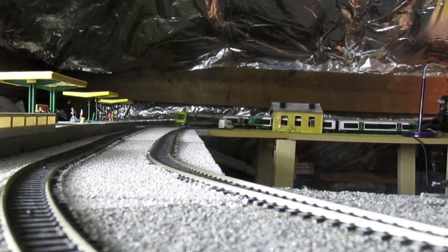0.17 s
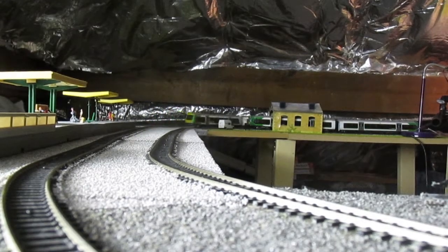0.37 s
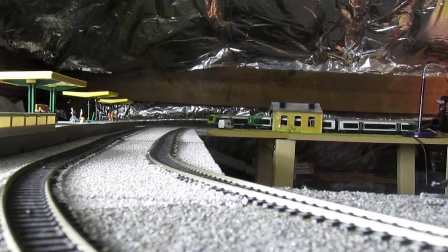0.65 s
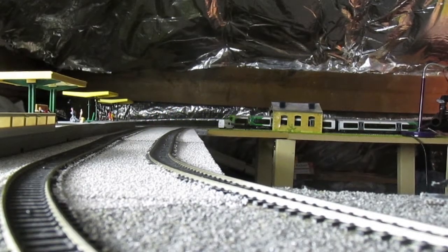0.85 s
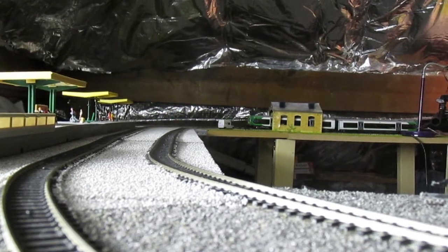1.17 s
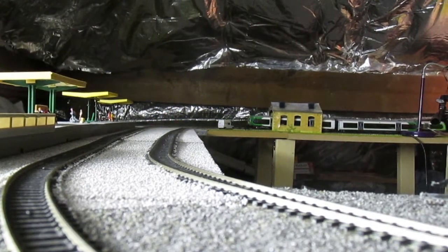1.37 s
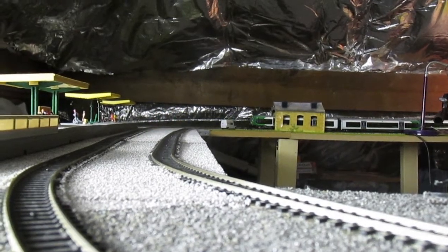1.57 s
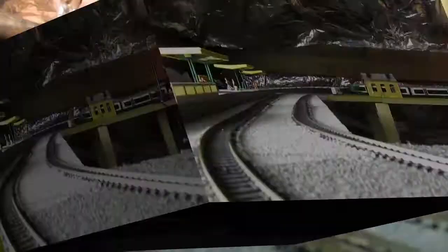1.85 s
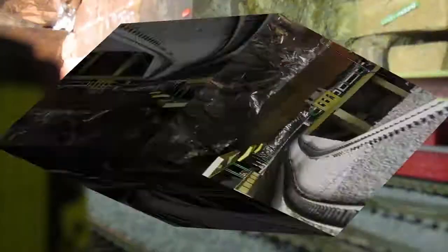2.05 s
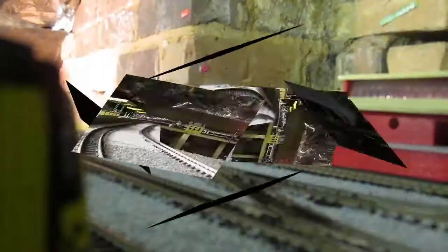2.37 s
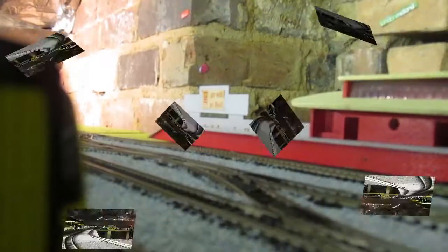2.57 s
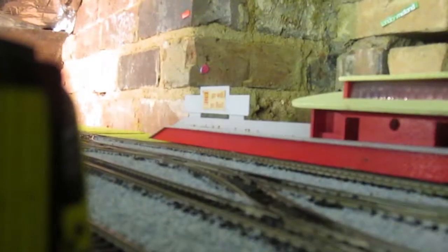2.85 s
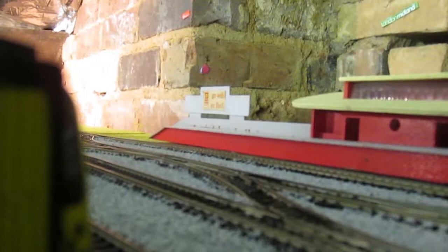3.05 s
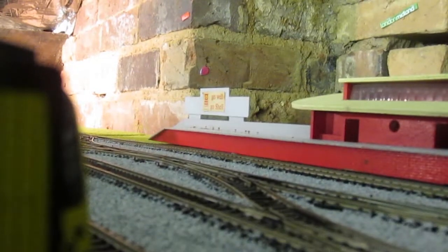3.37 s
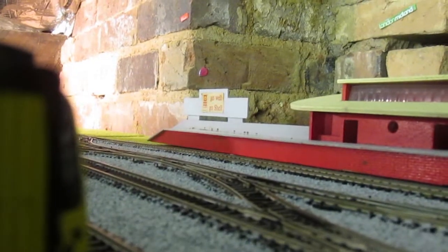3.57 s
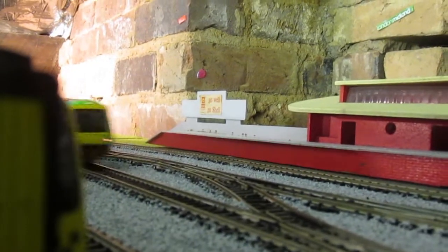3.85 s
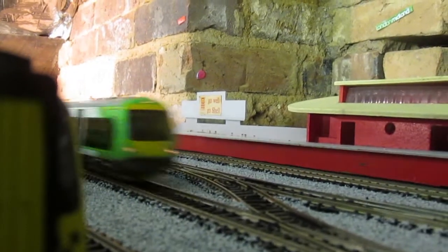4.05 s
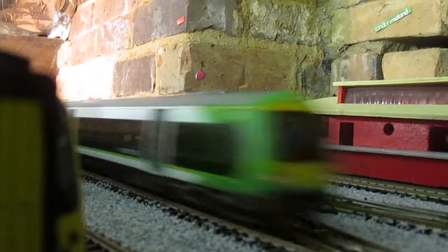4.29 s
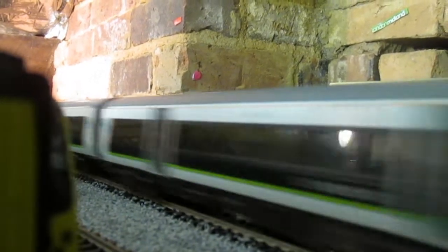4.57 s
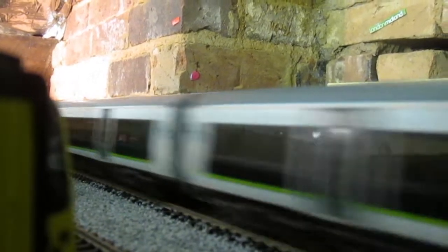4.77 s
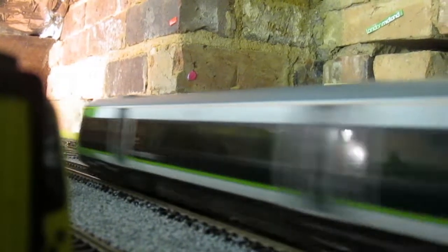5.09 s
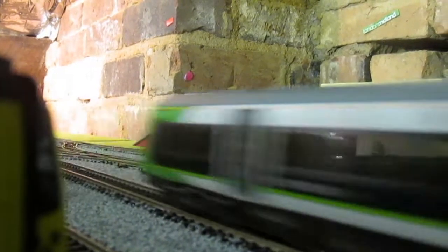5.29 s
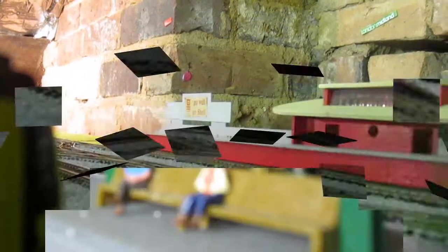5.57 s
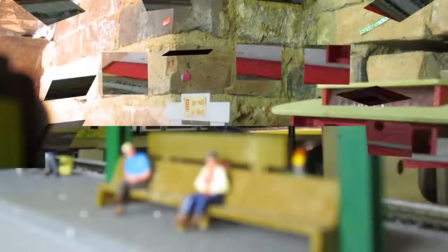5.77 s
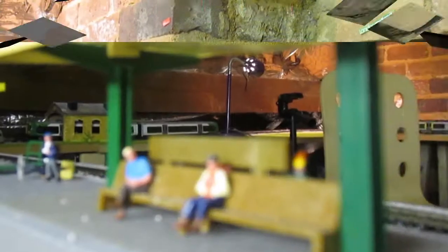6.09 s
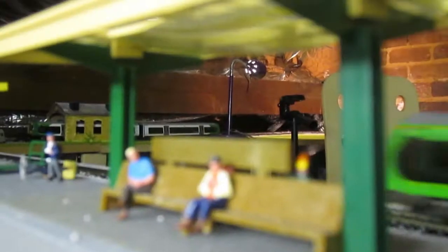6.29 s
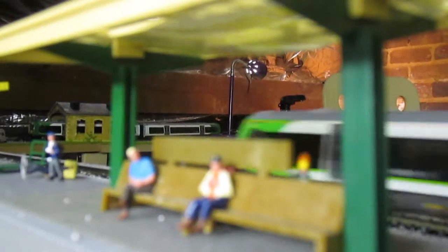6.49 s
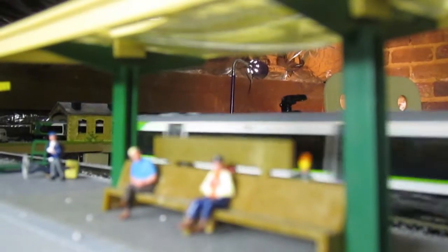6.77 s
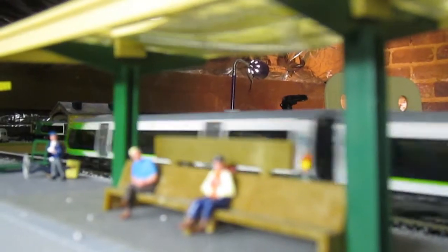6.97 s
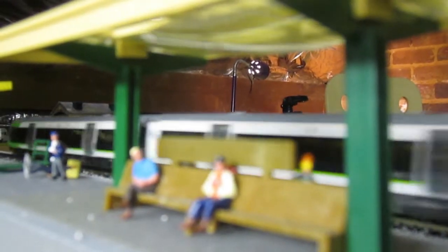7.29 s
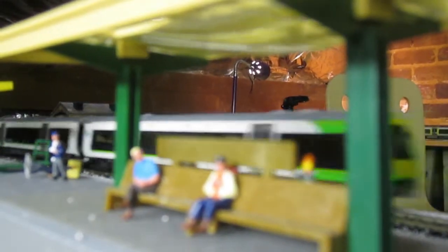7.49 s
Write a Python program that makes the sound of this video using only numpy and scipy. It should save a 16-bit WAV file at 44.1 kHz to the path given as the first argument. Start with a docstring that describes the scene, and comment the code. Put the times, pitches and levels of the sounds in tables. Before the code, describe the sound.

Model railway indoors, three abrupt viewpoints. Steady high motor whine and faint wheel hiss far off, cut to near silence. Beside the points, rumble and rattle swell into dense bright joint clicks, coupling clacks, gritty scrapes and low board knocks. A second short dropout leads to the platform: humming motor, swelling wheel roar, scattered clicks. Close stereo microphone, very little echo.

```python
"""A thin motor whine and the singing, hissing roll of wheels come first: a model train on an indoor layout.
It is heard from three places in turn, far across the board, beside a set of points, and from a station
platform, with a near-silent gap between them. The motor is a set of sine waves at multiples of its shaft
speed; the wheels are filtered noise and tiny hits; joints, couplings and the baseboard are struck
resonances or short bursts of filtered noise. A short room tail surrounds the wheel sounds."""
import sys
import numpy as np
from scipy import signal
from scipy.fft import rfft, irfft
from scipy.io import wavfile

SR = 44100
rng = np.random.default_rng(int(sys.argv[2]) if len(sys.argv) > 2 else 0)


def store_pcm(level_fs):
    """Save levels as 16-bit WAV."""
    pcm = np.round(np.clip(level_fs, -1, 1) * 32767).astype(np.int16)
    wavfile.write(sys.argv[1], SR, np.atleast_2d(pcm).T)


N = 336483
TIME = np.arange(N) / SR  # seconds
HZ = np.maximum(np.arange(N // 2 + 1) * SR / N, 1)  # pitches of the spectrum, kept above zero

# Rolling swells as the train comes near, and the flanges rub harder in the bends, at each place:
# time_s, rolling_db, flange_rub_db (relative; each sound follows them by its own amount)
ROLLING_FAR = [(0, 1, -0.5), (0.35, -1, -3.5), (0.95, -0.5, -5), (1.58, -3.5, -11), (1.75, -3, -7),
               (2.14, -2.5, -11)]
ROLLING_POINTS = [(2.3, -8.5, -9.5), (2.62, -8, -14.5), (2.92, -7, -8.5), (3.18, -4, -6.5),
                  (3.33, -4.5, -4.5), (3.55, -2, -3), (3.72, -2, -2.5), (3.9, -0.6, -2.5), (4.11, -2, -2),
                  (4.25, -0.5, -2.5), (4.62, 0.2, -2), (4.85, -0.8, -8), (5.03, -1.5, -8), (5.28, -2.2, -4),
                  (5.45, -3, -14)]
ROLLING_STATION = [(5.87, -9.5, -24.5), (6.17, -6.5, -14), (6.41, -3.5, -0.5), (6.57, -2.5, -5),
                   (6.69, -1.5, -0.5), (6.96, -2, -1), (7.08, -1, -0.5), (7.33, 0.2, -0.2), (7.63, -1, 1.2)]
# Wheels cross rail joints and point blades:
# time_s, level_db (relative), centre_hz, sharpness (filter Q), ring_s (time to fall 60 dB)
JOINT_CLICKS = [(0.141, -19, 4500, 1, 0.016), (0.76, -19, 4200, 0.9, 0.02), (0.846, -20, 4500, 1, 0.014),
                (2.026, -22, 4500, 1, 0.014), (3.199, -13.5, 3360, 1.3, 0.02),
                (3.261, -15.5, 4000, 1.2, 0.034), (3.548, -13, 4800, 1.6, 0.016),
                (3.5704, -7.5, 3330, 0.65, 0.015), (3.6362, -9.5, 3500, 0.73, 0.033),
                (3.734, -19, 4400, 1.2, 0.015), (3.8237, -12, 3850, 2.2, 0.011),
                (3.892, -5, 3300, 0.64, 0.016), (3.902, -16, 4200, 1.3, 0.017),
                (3.956, -3, 4500, 2.4, 0.03), (3.974, -18, 3060, 1.2, 0.016),
                (3.9825, -9, 4660, 1.5, 0.016), (3.991, -12, 4100, 1.8, 0.014),
                (4.0095, -17, 3760, 1.6, 0.016), (4.0194, -6.5, 3520, 1.6, 0.018),
                (4.074, -13, 4400, 1.3, 0.012), (4.13, -13, 5000, 1.3, 0.0091),
                (4.153, -12, 4400, 1.3, 0.014), (4.215, -12.5, 4010, 1.5, 0.048),
                (4.278, -6, 5000, 3.2, 0.025), (4.371, -16, 5200, 1, 0.018),
                (4.553, -8.5, 3200, 1.3, 0.021), (4.618, -9.5, 3500, 0.86, 0.038),
                (4.679, -4, 3620, 1.4, 0.014), (4.7298, -11, 3640, 1.1, 0.016),
                (4.748, -17, 4300, 1.3, 0.016), (4.8104, -7.5, 4400, 1.3, 0.031),
                (4.8736, -6, 4100, 1.4, 0.016), (4.888, -13, 4300, 1.3, 0.012),
                (5.049, -11.5, 3920, 3.2, 0.02), (5.144, -13.5, 3000, 2.6, 0.036),
                (5.202, -6, 4100, 1.4, 0.016), (5.265, -8, 4300, 1.3, 0.023),
                (5.521, -15, 3500, 2.8, 0.012), (5.5858, -14.5, 5960, 0.75, 0.019),
                (5.974, -21, 3600, 0.6, 0.02), (6.0485, -16, 3200, 0.53, 0.02),
                (6.421, -10, 3430, 0.85, 0.023), (6.4916, -8.5, 3300, 1.2, 0.011),
                (6.517, -17, 4200, 1.2, 0.014), (6.676, -6.5, 3030, 1.6, 0.016),
                (6.7, -15, 4070, 1.4, 0.014), (6.7428, -9, 3400, 2.5, 0.016),
                (6.884, -15, 3500, 1.2, 0.018), (7.048, -13, 3310, 1.2, 0.014),
                (7.089, -11, 3130, 1.2, 0.02), (7.111, -11, 3150, 1.4, 0.02),
                (7.153, -9.5, 3000, 1.3, 0.016), (7.3484, -9.5, 3130, 1.3, 0.016),
                (7.3893, -13, 3080, 3, 0.024), (7.409, -17, 4000, 1.2, 0.014),
                (7.508, -22, 4200, 1.2, 0.014), (7.517, -26, 4200, 1.2, 0.014)]
# The coaches turn away and hide their wheels; by the platform the treble is raised: time_s, treble_db
HIDDEN_WHEELS = [(4.85, 0), (5.35, -0.1), (5.72, -1), (5.87, 4.5)]


def motor():
    """The motor's hum and whine are tied to the turning of its shaft, with a different balance at each place."""
    # Level of the main tones: time_s, hum_db (twice a turn), third_db (3 times), whine_db (4 times)
    levels_far = [(0, -37, -44, -30.5), (0.3, -40, -46, -30), (0.56, -41.5, -38, -29.5),
                  (0.74, -47, -49, -26.5), (0.94, -43, -36.5, -30), (1.14, -55, -53, -29),
                  (1.32, -46, -39, -31), (1.56, -47, -49, -32.5), (1.75, -42, -35, -32),
                  (1.93, -37.5, -46, -33), (2.14, -41, -43, -36)]
    levels_points = [(2.3, -37.5, -58, -42), (2.55, -38, -63, -41), (2.78, -29, -67, -32.5),
                     (2.98, -29, -49, -32.5), (3.12, -28.5, -46, -37), (3.3, -31, -32.5, -28.5),
                     (3.44, -27.5, -44, -30), (3.56, -26, -30, -30.5), (3.83, -20, -36, -32.5),
                     (3.93, -22, -27.5, -29), (4.03, -31, -31.5, -33.5), (4.25, -26, -32, -32),
                     (4.6, -26, -31.5, -24), (4.92, -35.5, -40, -28.5), (5.3, -32.5, -44, -30),
                     (5.72, -29, -42, -33)]
    levels_station = [(5.87, -25, -44, -30.5), (6.03, -22.5, -41, -31), (6.34, -28, -45, -30),
                      (6.52, -22.5, -40, -34), (6.69, -18.5, -37, -34.5), (6.83, -36, -44, -31),
                      (6.96, -29, -50, -31), (7.2, -32.5, -47, -30.5), (7.63, -33, -47, -29)]
    # Weaker tones: multiple of the shaft speed, level_db against the whine
    overtones_far = [(5, -20), (6, -16), (8, -15.5), (9, -19.5)]
    overtones_points = [(5, -13.5), (6, -14.5), (9, -30)]
    overtones_station = [(5, -12), (6, -12), (10, -28)]
    return in_turn(
        shaft_tones(levels_far, overtones_far, wobble=0.0028, flutter_db=1.1, unbalance_db=-46.5),
        shaft_tones(levels_points, overtones_points, wobble=0.0069, flutter_db=3.0, unbalance_db=-50.5),
        shaft_tones(levels_station, overtones_station, wobble=0.0038, flutter_db=2.2, unbalance_db=-40))


def shaft_tones(levels, overtones, wobble, flutter_db, unbalance_db):
    """Unbalance shakes the board once a turn, the magnet hums twice, the third tone varies, the fourth whines."""
    # Shaft speed sags in the far bend, creeps up over the points, picks up past the platform:
    # time_s, turns_per_s (before a small random wobble)
    shaft_speed = [(0, 110.9), (0.55, 110.4), (1.3, 107.8), (2.14, 106.6), (2.8, 107.2), (3.2, 108.3),
                   (5.05, 108.4), (5.72, 110.5), (5.87, 99.3), (6.38, 99.4), (7.63, 109.5)]
    # A slack part of the baseboard booms once a shaft turn: middle_s, length_s, level_db
    slack_booms = [(1.45, 0.21, -43), (2.45, 0.37, -33.5), (3.15, 0.64, -33.5), (4.094, 0.24, -25.5),
                   (4.75, 0.56, -27.5), (6.78, 0.21, -38)]
    speed, = in_time(shaft_speed)
    hum_db, third_db, whine_db = in_time(levels)
    angle = 2 * np.pi * np.cumsum(speed * (1 + wobble * drift(9.0))) / SR
    boom = from_db(unbalance_db)
    boom = boom + sum(from_db(db) * swells(middle, length) for middle, length, db in slack_booms)
    tones = [(1, boom), (2, from_db(hum_db)), (3, from_db(third_db)), (4, from_db(whine_db))]
    tones += [(round(multiple), from_db(whine_db + db)) for multiple, db in overtones]
    out = 0
    for multiple, gain in tones:
        flutter = from_db(flutter_db * drift(24))
        out = out + gain * flutter * np.sin(multiple * angle + 2 * np.pi * rng.random())
    return out


def wheels():
    """Wheels rattle over the rails; moments after each joint they roll louder. Rows: mid and side."""
    # Colour of the rolling noise: pitch_hz, relative_db
    track_far = [(500, -4), (780, -1.5), (950, 4.5), (1150, -1), (1500, -10.5), (1900, 0), (3300, -4.5),
                 (4300, -7.5), (6300, -7), (8500, -13), (10300, -15.5), (12600, -13.5), (15000, -24)]
    track_points = [(500, 0.5), (780, 2), (950, 5), (1220, 3.5), (1600, 4.5), (2000, 8.5), (2700, 10.5),
                    (3600, 1.5), (4400, -4.5), (6200, -6), (8400, -13.5), (10300, -15.5), (12600, -18.5),
                    (15000, -25.5)]
    track_station = [(500, -3.5), (720, -4.5), (860, -1), (1000, 1), (1250, 0), (1640, 1), (2300, 6),
                     (3300, 2), (4300, -10.5), (6200, -10.5), (8100, -17.5), (10300, -22.5), (12000, -24.5),
                     (15000, -31.5)]
    # Narrow resonances of coaches and track: pitch_hz, width_hz, lift_db
    peaks_far = [(894, 50, -2), (1277, 57, 8), (3060, 130, 4), (3450, 170, 3.5), (12500, 1500, -1.5)]
    peaks_points = [(647, 58, 4.5), (950, 140, 2.7), (1504, 260, 3.4), (2360, 150, 1.3), (6100, 670, 0.47),
                    (12500, 990, 2)]
    peaks_station = [(1004, 28, 3.2), (1500, 44, 2), (3320, 300, 1.4), (5600, 780, 1.3), (11400, 770, 3.2)]
    far_force = contact(per_s=5000, spread_db=-3.5, smooth_db=1.5,
                        jolts_per_s=34, jolt_size=0.67, jolt_s=0.0099, rattle_db=-17)
    near_force = contact(per_s=4500, spread_db=2, smooth_db=3.0,
                         jolts_per_s=150, jolt_size=0.8, jolt_s=0.0021, rattle_db=-12)
    return from_db(shaking()) * in_turn(
        rolling(ROLLING_FAR, track_far, peaks_far, far_force, sing_hz=1542, sing_width=420,
                body_db=-35.0, body_follows=0.44, wheel_db=-32.0, hiss_db=-34, hiss_shakes=0.4,
                sing_db=-30.0, sing_follows=0.73, waver_db=0.76, side_db=-14.5),
        rolling(ROLLING_POINTS, track_points, peaks_points, near_force, sing_hz=2920, sing_width=1300,
                body_db=-27.5, body_follows=0.84, wheel_db=-28.5, hiss_db=-29.0, hiss_shakes=1.0,
                sing_db=-35.0, sing_follows=0.4, waver_db=0.5, side_db=-11.0),
        rolling(ROLLING_STATION, track_station, peaks_station, near_force, sing_hz=1976, sing_width=220,
                body_db=-27.5, body_follows=0.41, wheel_db=-25.5, hiss_db=-30.5, hiss_shakes=0.34,
                sing_db=-32.0, sing_follows=0.37, waver_db=1.16, side_db=-12.0))


def rolling(curve, track, peaks, force, sing_hz, sing_width, body_db, body_follows, wheel_db,
            hiss_db, hiss_shakes, sing_db, sing_follows, waver_db, side_db):
    """Contact force rattles the coach bodies, rings the wheels and hisses along the rails; one resonance sings."""
    # Uneven track makes the coach bodies rattle harder: middle_s, length_s, lift_db
    uneven_track = [(3.49, 0.082, 1), (3.917, 0.054, 1.5), (4.937, 0.23, 2.5), (5.587, 0.14, 3.5),
                    (6.597, 0.64, 3), (7.376, 0.084, 2.5)]
    near, rub = in_time(curve)
    rattle = sum(db * swells(middle, length) for middle, length, db in uneven_track)
    shake = shaking()
    shade, = in_time(HIDDEN_WHEELS)
    spectrum = rfft(force) * colour(track) * bells(peaks)
    parts = [band(550, 1900), band(1900, 3800), band(3800, SR)]  # bodies, wheels, hiss
    overlap = np.maximum(sum(parts), 1)
    levels = [body_db + body_follows * near + rattle + shake,
              wheel_db + rub,
              hiss_db + near + shade + hiss_shakes * shake]
    noise = 0
    for part, level in zip(parts, levels):
        layer = rms_one(irfft(spectrum * part / overlap, N))
        noise = noise + from_db(level + waver_db * drift(8.3)) * layer
    resonance = bells(peaks) / (1 + (2 * (HZ - sing_hz) / sing_width) ** 4)
    sing = rms_one(shaped(rng.standard_normal((2, N)), resonance))
    sing_level = from_db(sing_db + sing_follows * (near + rub) + waver_db * drift(25))
    return (noise + sing_level * sing) * from_db([[0], [side_db]])


def contact(per_s, spread_db, smooth_db, jolts_per_s, jolt_size, jolt_s, rattle_db):
    """Wheel treads hit tiny bumps; each jolt of a bogie presses them down for a moment. Rows: mid and side."""
    hits = (rng.random((2, N)) < per_s / SR) * rng.choice([-1, 1], (2, N))
    sizes = from_db(spread_db * np.minimum(rng.exponential(1, (2, N)), 3))
    grains = rms_one(hits * sizes)
    jolts = (rng.random(N) < jolts_per_s / SR) * rng.random(N)
    load = 1 + jolt_size * fading(jolts, jolt_s)
    smooth = from_db(smooth_db) * rng.standard_normal((2, N))
    force = rms_one((grains + smooth) * load)
    return force + from_db(rattle_db) * loose_parts(per_s=450, cycles=39, spread_db=4.5)


def loose_parts(per_s, cycles, spread_db):
    """Axles and body clips tap at random, each ringing briefly at its own pitch. Rows: mid and side."""
    when, pitch, size, across = rng.random((round(per_s * N / SR), 4)).T[:, :, None]
    hz = 900 * (7000 / 900) ** pitch
    step = np.arange(SR // 50)
    turns = hz * step / SR
    decay = np.exp(-np.log(1000) * turns / cycles)  # falls 60 dB in this many cycles
    taps = np.sqrt(hz) * from_db(spread_db * size) * decay * np.sin(2 * np.pi * turns)
    at = ((when * N).astype(int) + step).ravel()
    mid_and_side = taps, taps * (4 * across - 2)
    return rms_one(np.array([np.bincount(at, x.ravel(), N)[:N] for x in mid_and_side]))


def shaking():
    """A bogie that has crossed a joint shakes on: a lift in dB that dies away after every joint."""
    shake_s, shake_db = 0.012, 3.5  # fading time; size of the kick from a joint listed at 0 dB
    kicks = np.zeros(N)
    for start, db, *_ in JOINT_CLICKS:
        kicks[round(start * SR)] = shake_db * from_db(db)
    return fading(kicks, shake_s)


def joints(rise_s, top_hz, crack_db, tick_db, tick_s, level_db):
    """A wheel scuffs over a rail gap and strikes the next rail end: a burst of noise with one sharp tick."""
    out, t = np.zeros(N + SR), TIME[:SR // 10]
    soften = signal.butter(4, min(top_hz, SR / 3), fs=SR, output="sos")
    for start, db, hz, sharpness, ring_s in JOINT_CLICKS:
        shape = (1 - np.exp(-t / rise_s)) * np.exp(-np.log(1000) * t / ring_s)
        scuff = rng.standard_normal(len(t)) * shape
        scuff[round(tick_s * SR)] += from_db(tick_db)
        peak = signal.iirpeak(min(hz, SR / 5), max(sharpness, .5), fs=SR)
        click = signal.sosfilt(soften, signal.lfilter(*peak, scuff))
        click = click + from_db(crack_db) * scuff
        at = round(start * SR)
        out[at:at + len(t)] += from_db(db + level_db) * click / np.abs(click).max()
    return out[:N]


def couplings(rise_s, rattle_s, crack_db, bounce_s, bounce_db, level_db):
    """A coupling snatches tight, bounces once, chatters briefly and rings the modes of the coach end."""
    # Clacks: time_s, level_db (relative), centre_hz (where the blow rings most), spread_octaves
    clacks = [(3.569, -16, 1400, 0.5), (3.637, -12, 1700, 0.72), (3.952, -13.5, 1300, 0.58),
              (3.976, -20, 1600, 0.23), (4.039, -15, 1500, 0.71), (4.172, -15, 1300, 0.63),
              (4.265, -15, 1400, 0.3), (4.361, -14, 1400, 0.2), (4.678, -25, 1500, 1.1),
              (4.954, -14.5, 1200, 0.42), (5.187, -15.5, 800, 0.38), (5.249, -17, 1200, 0.44),
              (5.304, -18, 1300, 0.34), (5.434, -21, 850, 0.13), (5.59, -18, 1100, 0.5),
              (5.974, -16.5, 5700, 0.28), (5.976, -13, 2300, 0.78), (5.992, -16, 2150, 0.3),
              (6.0495, -11, 2700, 0.98), (6.542, -17, 2000, 0.4), (6.596, -19, 1900, 0.5),
              (7.048, -12, 1050, 0.31), (7.09, -12, 1050, 0.43), (7.111, -15.5, 1100, 0.5),
              (7.226, -21, 1600, 0.82), (7.606, -15, 2400, 0.6)]
    # Ringing of the coach end: pitch_hz, relative_db, ring_s (time to fall 60 dB)
    coach_modes = [(672, -2, 0.024), (860, -2, 0.033), (1087, -2.5, 0.021), (1310, 0, 0.017),
                   (1530, 1.5, 0.015), (1990, -4, 0.048), (2700, 1.5, 0.014), (3060, -0.5, 0.014),
                   (3450, 2.5, 0.028), (4150, -5, 0.012), (5170, -2.5, 0.009), (5500, -2, 0.008),
                   (6050, 1.5, 0.009)]
    out, t = np.zeros(N + SR), TIME[:SR // 10]
    for start, db, centre_hz, octaves in clacks:
        for delay, loss_db in ((0, 0), (bounce_s, bounce_db)):
            chatter = from_db(crack_db) * rng.standard_normal(len(t)) * np.exp(-t / rattle_s)
            ring = struck(coach_modes, centre_hz, octaves, rise_s, t)
            at = round((start + delay) * SR)
            out[at:at + len(t)] += from_db(db + loss_db + level_db) * (ring + chatter)
    return out[:N]


def flanges():
    """A flange presses against the outer rail and a wheel sings out: short swells of narrow noise."""
    # Presses: middle_s, length_s, level_db, pitch_hz, width_hz
    presses = [(0.03, 0.038, -32, 1520, 400), (0.11, 0.15, -36.5, 3380, 700),
               (0.125, 0.03, -30.5, 1490, 400), (0.183, 0.038, -29, 1470, 400),
               (0.358, 0.022, -29, 1500, 350), (0.434, 0.025, -34, 1420, 300),
               (0.524, 0.025, -30, 1500, 400), (0.63, 0.025, -33, 1360, 250),
               (0.706, 0.031, -30, 1560, 350), (0.765, 0.017, -31, 1500, 350),
               (0.89, 0.06, -35, 2900, 1300), (0.92, 0.028, -28, 1530, 300),
               (1.431, 0.02, -32.5, 1500, 400), (1.486, 0.02, -32, 1500, 400),
               (1.593, 0.02, -34.5, 1510, 400), (3.015, 0.035, -31, 2380, 450),
               (3.14, 0.11, -30, 3230, 350), (3.18, 0.12, -31, 2530, 450), (3.44, 0.04, -32, 3280, 300),
               (3.53, 0.13, -29.5, 3250, 300), (3.7, 0.16, -33.5, 2390, 400),
               (4.58, 0.13, -29.5, 3140, 700), (6.454, 0.1, -27.5, 3050, 850),
               (6.58, 0.16, -28.5, 1950, 220), (6.9, 0.078, -26, 2700, 1000),
               (7.485, 0.045, -24, 3010, 350)]
    return resonances(presses, flicker_db=2.0)


def coach_drones():
    """The hollow coach shells drone: longer swells of narrow noise."""
    # Drones: middle_s, length_s, level_db, pitch_hz, width_hz
    shell_drones = [(3.45, 0.2, -35.5, 966, 150), (5.35, 0.38, -36.5, 845, 180),
                    (5.35, 0.31, -37, 1350, 180), (5.57, 0.15, -35.5, 646, 200)]
    return resonances(shell_drones, flicker_db=2.5)


def resonances(rows, flicker_db):
    """Noise through narrow filters swells and fades, with an unsteady level."""
    out = 0
    for middle, length, db, hz, width in rows:
        narrow = signal.butter(2, [hz - width / 2, hz + width / 2], "band", fs=SR, output="sos")
        tone = rms_one(signal.sosfilt(narrow, rng.standard_normal(N)))
        out = out + from_db(db) * swells(middle, length) * tone
    return out * from_db(flicker_db * drift(25))


def scrapes(slips_per_s, octaves, level_db):
    """A wheel scrubbing along a check rail sticks and slips: a short gritty run of tiny clicks."""
    # Scrapes: middle_s, length_s, level_db (relative), centre_hz
    scrubs = [(3.267, 0.019, -22, 2660), (3.437, 0.015, -24, 2800), (3.49, 0.0098, -32, 3180),
              (3.555, 0.034, -26.5, 2900), (3.612, 0.014, -21, 2600), (3.671, 0.011, -21, 2900),
              (3.746, 0.014, -25, 2400), (3.806, 0.013, -22, 2800), (3.878, 0.012, -20, 3000),
              (4.049, 0.0061, -23.5, 4600), (4.062, 0.01, -21, 3200), (4.142, 0.031, -23, 2840),
              (4.301, 0.01, -19.5, 3600), (4.393, 0.012, -27, 3000), (4.445, 0.035, -26, 4800),
              (4.497, 0.02, -21, 4400), (4.648, 0.019, -19.5, 3020), (4.753, 0.01, -30, 3600),
              (4.96, 0.011, -21, 3600)]
    out, t = np.zeros(N + SR), TIME[:SR // 8]
    for middle, length, db, hz in scrubs:
        slips = (rng.random(len(t)) < slips_per_s / SR) * rng.choice([-1, 1], len(t))
        edges = np.minimum(hz * 2 ** (octaves * np.array([-.5, .5])), SR / 3)
        grit = rms_one(signal.sosfilt(signal.butter(2, edges, "band", fs=SR, output="sos"), slips))
        swell = np.exp(-2 * ((t - t.mean()) / length) ** 2)
        at = round((middle - t.mean()) * SR)
        out[at:at + len(t)] += from_db(db + level_db) * grit * swell
    return out[:N]


def specks(per_s, spread_db, low_hz, high_hz, level_db, follows):
    """Beside the points, treads crush specks of dirt on the rail: a crackle of small uneven ticks."""
    near, _ = in_time(ROLLING_POINTS)
    shade, = in_time(HIDDEN_WHEELS)
    sizes = from_db(spread_db * np.minimum(rng.exponential(1, N), 2.5))
    ticks = (rng.random(N) < per_s / SR) * sizes
    bursts = fading(ticks, 0.0013) * rng.standard_normal(N)
    edges = [low_hz, min(high_hz, SR / 3)]
    crackle = signal.sosfilt(signal.butter(2, edges, "band", fs=SR, output="sos"), bursts)
    return in_turn(0, from_db(level_db + follows * (near + shade)) * rms_one(crackle))


def thumps(rise_s, level_db):
    """A dropping bogie sets the baseboard's modes ringing, each blow with its own balance."""
    # Drops: time_s, level_db (relative), centre_hz (where the blow rings most), spread_octaves
    drops = [(1.792, -23.5, 80, 0.59), (2.059, -26, 110, 0.37), (3.251, -18, 220, 0.46),
             (3.532, -10.5, 220, 1), (3.562, -16, 85, 0.68), (3.714, -17, 150, 0.81),
             (3.915, -11, 120, 0.67), (3.985, -14, 115, 0.65), (4.037, -8, 127, 0.83),
             (4.205, -8.5, 230, 0.37), (4.354, -15, 100, 0.53), (4.455, -24, 115, 0.5),
             (4.52, -20, 115, 0.6), (4.607, -22, 150, 0.8), (4.728, -13, 116, 0.26),
             (4.763, -11.5, 90, 0.89), (4.851, -17.5, 120, 0.66), (4.925, -14.5, 98, 0.3),
             (5.011, -18.5, 118, 0.3), (5.092, -12, 250, 0.31), (5.298, -13, 150, 0.51),
             (5.358, -17, 215, 0.4), (5.585, -15.5, 151, 0.83), (7.479, -17, 150, 0.53)]
    # Ringing of the baseboard: pitch_hz, relative_db, ring_s (time to fall 60 dB)
    board_modes = [(72, -3, 0.075), (102.3, -4.5, 0.097), (122, -5.5, 0.12), (165, -1.5, 0.11),
                   (226.5, 2.5, 0.09), (339.5, -1.5, 0.19)]
    out, t = np.zeros(N + SR), TIME[:SR // 3]
    for start, db, centre_hz, octaves in drops:
        at = round(start * SR)
        ring = struck(board_modes, centre_hz, octaves, rise_s, t)
        out[at:at + len(t)] += from_db(db + level_db) * ring
    return out[:N]


def baseboard():
    """The baseboard rumbles under the rolling wheels, with its own colour at each place."""
    # Colour of the rumble: pitch_hz, relative_db
    board_far = [(22, -30.5), (40, 0), (60, 4.5), (85, 1), (130, 2), (175, -2.5), (240, 2), (300, -4.5),
                 (550, -0.5)]
    board_points = [(22, -33), (40, -19.5), (60, -10), (85, -4), (125, 1), (175, -4.5), (240, -2),
                    (300, -9), (550, -8.5)]
    board_station = [(22, -25), (40, -20), (60, 0.5), (85, -4.5), (125, -1.5), (175, -2), (240, -1.5),
                     (300, -12), (550, -5.5)]
    return in_turn(
        rumble(ROLLING_FAR, board_far, level_db=-38.0, follows=0.32, lumpy_db=0.9, side_db=-14.0),
        rumble(ROLLING_POINTS, board_points, level_db=-26.0, follows=1.3, lumpy_db=1.44, side_db=-15),
        rumble(ROLLING_STATION, board_station, level_db=-31.5, follows=0.15, lumpy_db=2.0, side_db=-11.5))


def rumble(curve, board, level_db, follows, lumpy_db, side_db):
    """The board radiates the low part of the wheel roughness, almost alike at both microphones."""
    near, _ = in_time(curve)
    mid, side = rms_one(shaped(rng.standard_normal((2, N)), colour(board) * band(15, 513)))
    level = from_db(level_db + follows * near + lumpy_db * drift(5.8))
    return level * (mid + from_db(side_db) * side * np.array([[1], [-1]]))


def room(x, width, shared_db, apart_db):
    """Direct sound and a short diffuse tail; the two close microphones differ mostly in the treble."""
    # Where the train is: time_s, lean_db (left minus right, before the lean is coloured)
    bearing = [(0, 2), (2.14, 2), (2.3, 3), (3.4, 2), (4.2, 1.3), (5.1, 1.5), (5.95, 3.5), (6.4, 1.5),
               (7.63, 1.5)]
    # Colour of the difference between the microphones: pitch_hz, level_db
    apart_colour = [(300, -2.5), (550, -3), (1300, -3.5), (2400, 0), (5000, 3), (9000, 0), (15000, -0.5)]
    # Colour of the lean to one side: pitch_hz, level_db
    lean_colour = [(200, -24), (800, -12), (2300, -0.5), (5000, 3.5), (11000, 1.5)]
    t60_s = 0.049
    t = TIME[:SR // 3]
    tails = rng.standard_normal((2, len(t))) * np.exp(-np.log(1000) * t / t60_s) * (t > .002)
    shared, apart = [from_db(db) * tail / np.linalg.norm(tail)
                     for db, tail in zip((shared_db, apart_db), tails)]
    mid = (x + signal.oaconvolve(x, shared)[:N]) / np.sqrt(1 + from_db(shared_db) ** 2)
    side = shaped(width + signal.oaconvolve(x, apart)[:N], colour(apart_colour))
    pair = np.array([mid + side, mid - side])
    lean = from_db(in_time(bearing)[0] / 2 * np.array([[1], [-1]]))  # the nearer port gets more treble
    return pair + (lean - 1) * shaped(pair, colour(lean_colour))


def in_turn(*places):
    """Each place is heard during its own stretch."""
    # The stretches of sound: start_s, end_s
    stretches = [(0, 2.141), (2.303, 5.722), (5.874, 7.63)]
    return sum(x * ((TIME >= start) & (TIME < end)) for x, (start, end) in zip(places, stretches))


def struck(modes, centre_hz, octaves, rise_s, t):
    """A blow swells and rings the modes that lie near its centre; peak 1."""
    x = 0
    for hz, db, ring_s in modes:
        share = np.exp(-.5 * (np.log2(hz / centre_hz) / octaves) ** 2)
        tone = np.sin(2 * np.pi * (hz * t + rng.random()))
        x = x + from_db(db - 60 * t / ring_s) * share * tone
    x = x * (1 - np.exp(-t / rise_s))
    return x / np.abs(x).max()


def fading(kicks, fade_s):
    """Let every kick die away, falling to about a third in fade_s."""
    return signal.lfilter([1], [1, -np.exp(-1 / (fade_s * SR))], kicks + 1e-18)


def swells(middle_s, length_s):
    """A smooth rise and fall of height 1."""
    return np.exp(-2 * ((TIME - middle_s) / length_s) ** 2)


def drift(rate):
    """Slow random wander of spread 1 that changes about rate times a second."""
    step = 20  # samples between the points of the wander
    r = np.exp(-2 * np.pi * rate * step / SR)
    slow = signal.lfilter([1], [1, -2 * r, r * r], rng.standard_normal(N // step + 2002))
    slow = slow[2000:]  # skip the filter's settling
    return np.interp(np.arange(N) / step, np.arange(len(slow)), rms_one(slow))


def from_db(db):
    """Decibels to gain."""
    return 10 ** (np.asarray(db) / 20)


def rms_one(x):
    """Scale to an average strength (rms) of 1."""
    return x / np.sqrt(np.mean(x ** 2) + 1e-20)


def in_time(rows):
    """The columns of a curve, one value a sample."""
    s, *columns = np.transpose(rows)
    return [np.interp(TIME, s, c) for c in columns]


def colour(points):
    """Gain at every frequency, drawn through pitch_hz and level_db points."""
    hz, db = np.transpose(points)
    return from_db(np.interp(np.log(HZ), np.log(hz), db))


def bells(peaks):
    """Gain at every frequency from pitch_hz, width_hz, lift_db resonances."""
    return from_db(sum(db / (1 + (2 * (HZ - hz) / width) ** 2) for hz, width, db in peaks))


def band(low_hz, high_hz, order=8):
    """Gain of a pass band with rounded edges."""
    return 1 / np.sqrt((1 + (low_hz / HZ) ** (2 * order)) * (1 + (HZ / high_hz) ** (2 * order)))


def shaped(x, gain):
    """Filter by a gain per frequency."""
    return irfft(rfft(x) * gain, N)


def scene():
    """Motor and board skip the room; the wheel noise spreads along the train and through the room."""
    rolling_noise, width = wheels()
    clicks = joints(rise_s=0.0016, top_hz=7430, crack_db=-19, tick_db=10, tick_s=0.0015, level_db=2.2)
    clicks = clicks + couplings(rise_s=0.0013, rattle_s=0.0053, crack_db=-15,
                                bounce_s=0.0035, bounce_db=-2, level_db=-1.0)
    rubs = flanges() + coach_drones() + scrapes(slips_per_s=2300, octaves=0.59, level_db=-4.0)
    rubs = rubs + specks(per_s=110, spread_db=1.0, low_hz=1700, high_hz=6660, level_db=-32, follows=2.34)
    board = thumps(rise_s=0.0089, level_db=-4.0) + baseboard()
    return motor() + board + room(rolling_noise + clicks + rubs, width, shared_db=-12.0, apart_db=-14.0)


def record(dry):
    """The microphone ports shade the treble, the sound drops out between stretches, the top is cut."""
    # Shading by the ports: pitch_hz, width_hz, lift_db
    port_dips = [(7830, 120, -11.5), (10450, 2800, -4)]
    cutoff_hz = 15300
    on = in_turn(0.97, 0.98, 0.85)  # gain of each place
    fall = np.exp(-1 / (0.0083 * SR))
    tail = from_db(-8.5) * signal.lfilter([1 - fall], [1, -fall], on)
    gate = np.maximum(on, tail)  # after each drop the gain dies away from a lower level
    top_cut = signal.ellip(12, .1, 80, cutoff_hz, fs=SR, output="sos")
    return signal.sosfilt(top_cut, gate * shaped(dry, bells(port_dips)) + 1e-18)


dry = scene()
out = record(dry)
store_pcm(out)
```